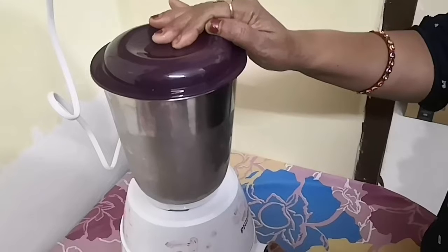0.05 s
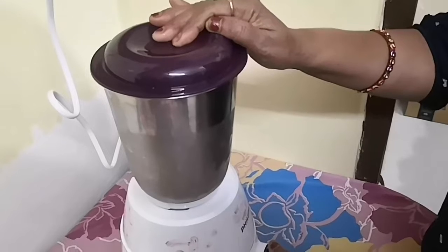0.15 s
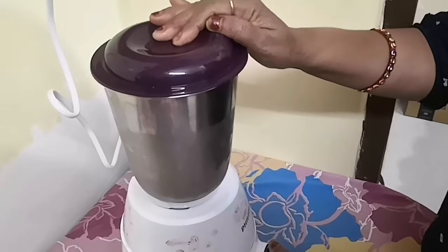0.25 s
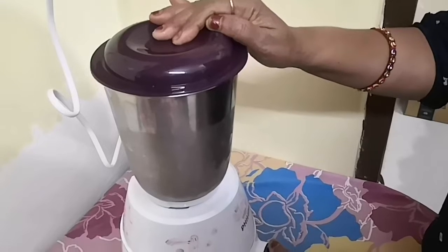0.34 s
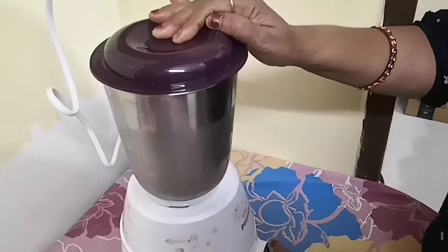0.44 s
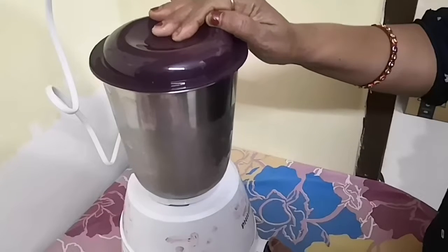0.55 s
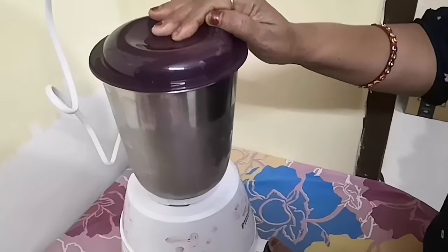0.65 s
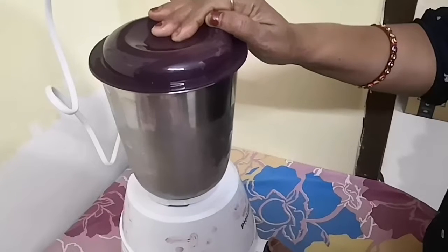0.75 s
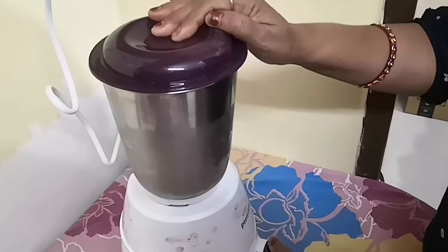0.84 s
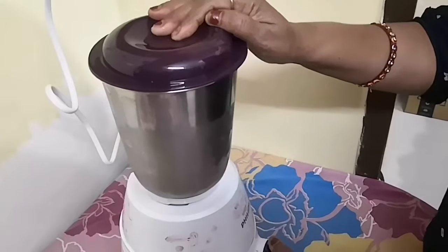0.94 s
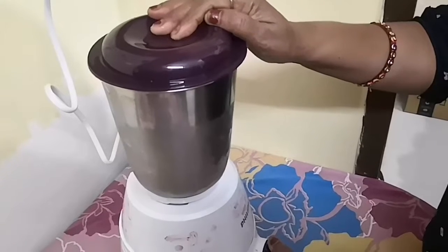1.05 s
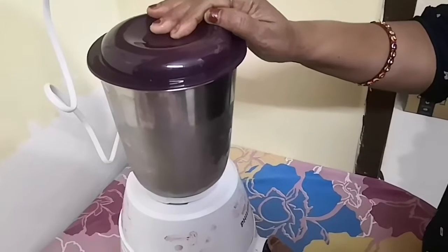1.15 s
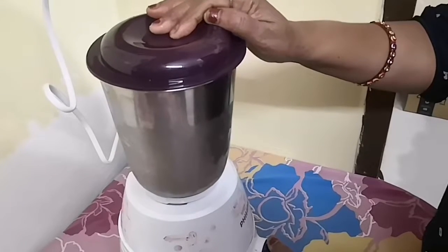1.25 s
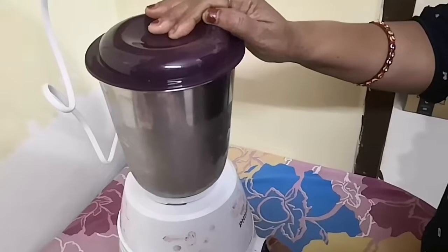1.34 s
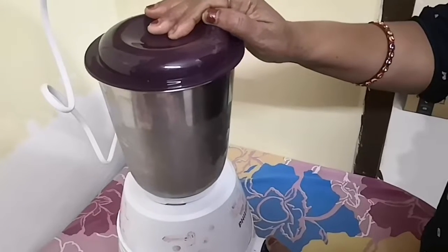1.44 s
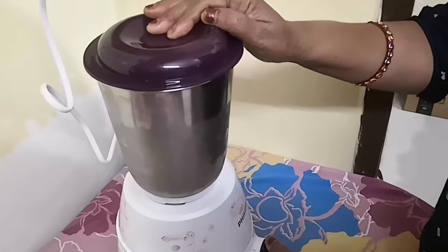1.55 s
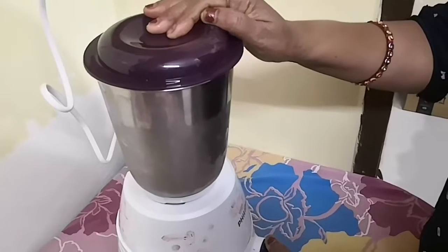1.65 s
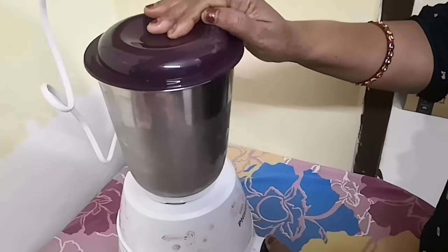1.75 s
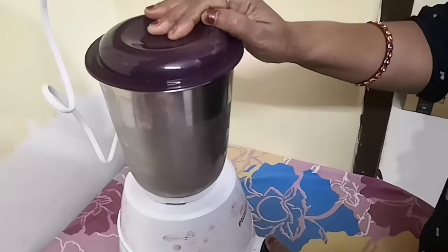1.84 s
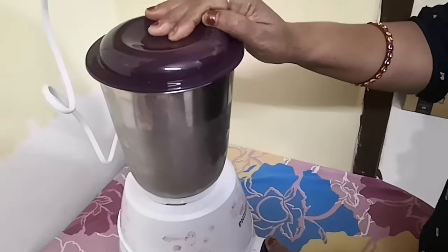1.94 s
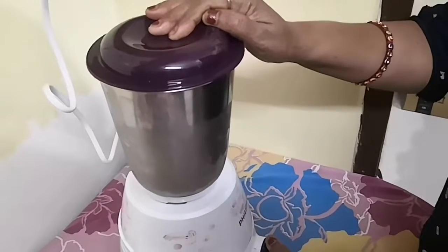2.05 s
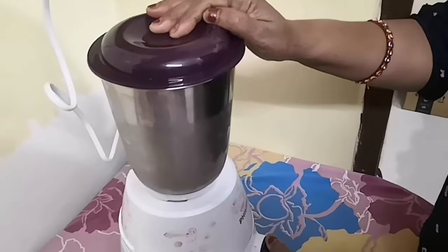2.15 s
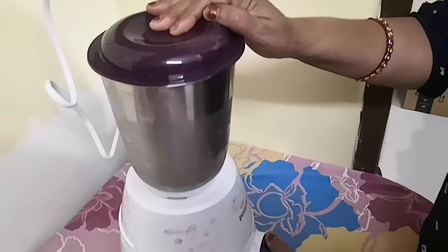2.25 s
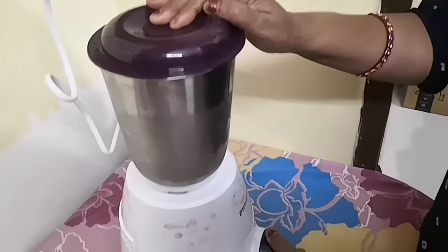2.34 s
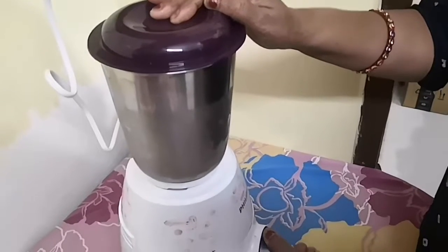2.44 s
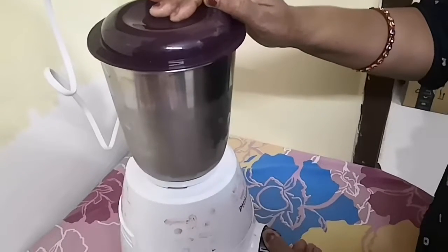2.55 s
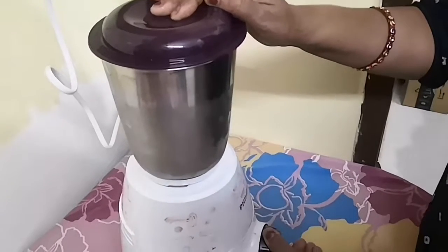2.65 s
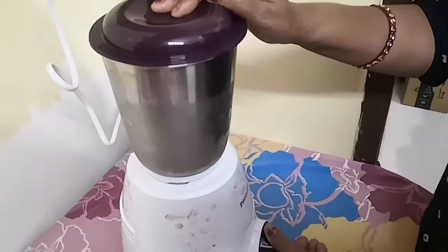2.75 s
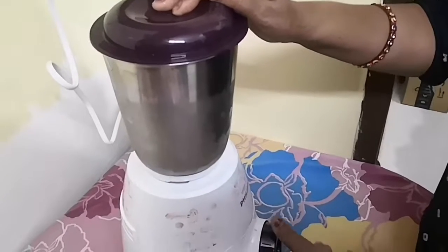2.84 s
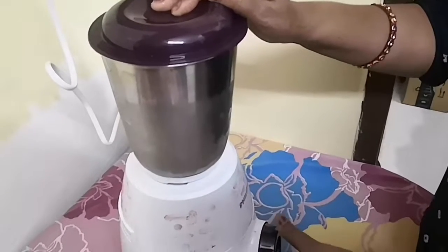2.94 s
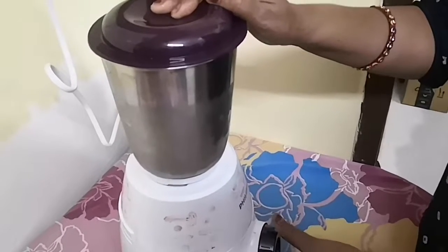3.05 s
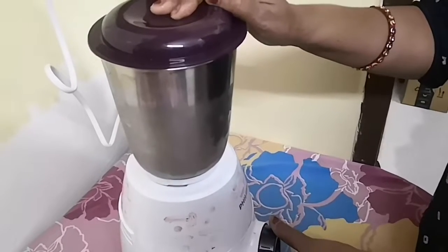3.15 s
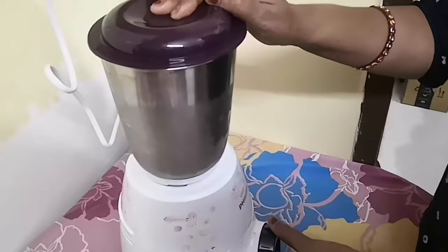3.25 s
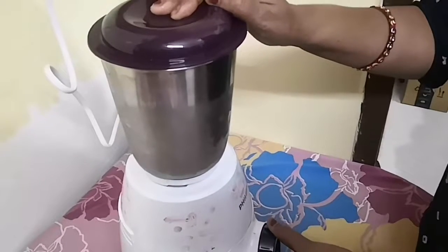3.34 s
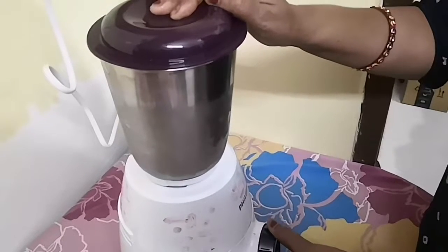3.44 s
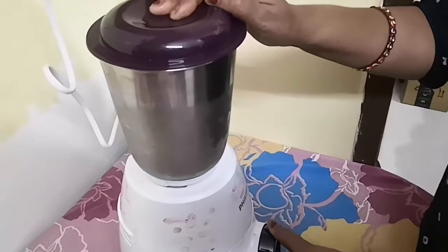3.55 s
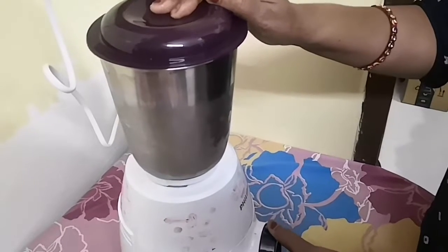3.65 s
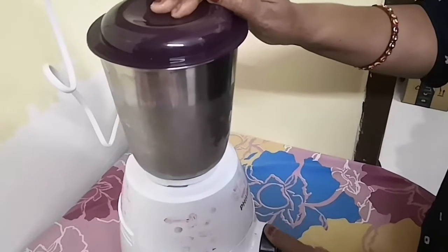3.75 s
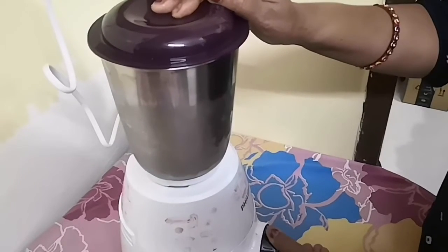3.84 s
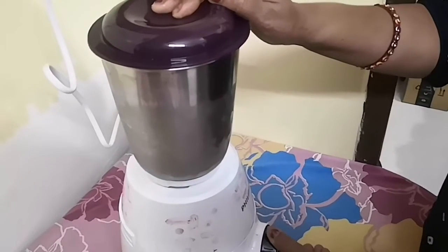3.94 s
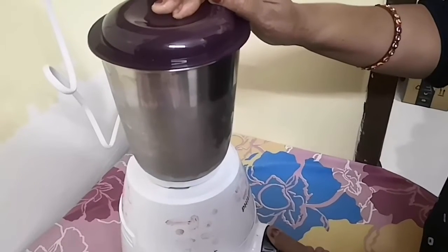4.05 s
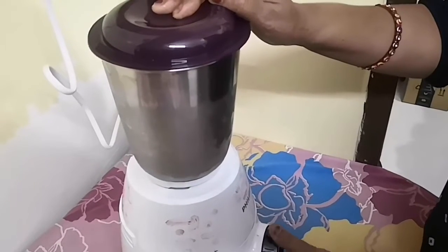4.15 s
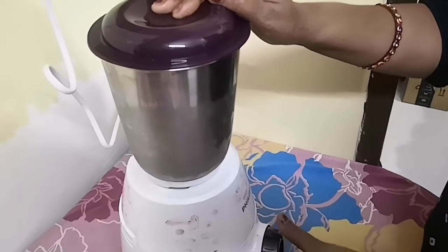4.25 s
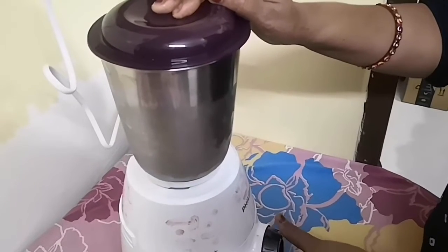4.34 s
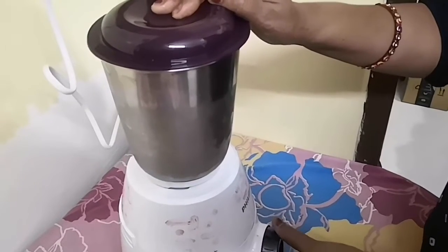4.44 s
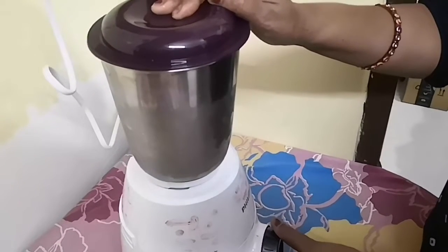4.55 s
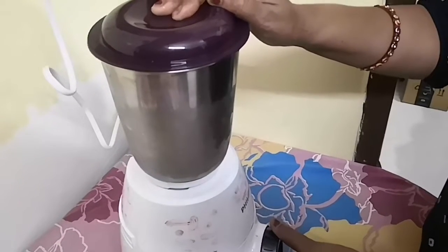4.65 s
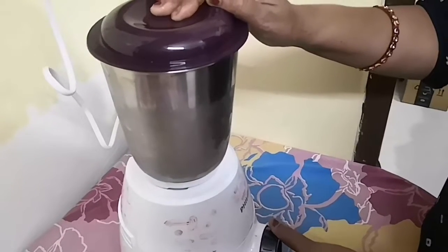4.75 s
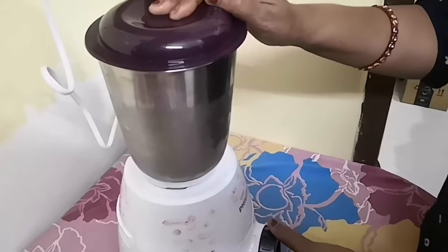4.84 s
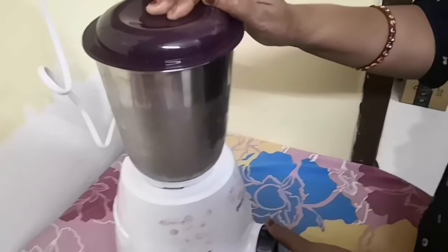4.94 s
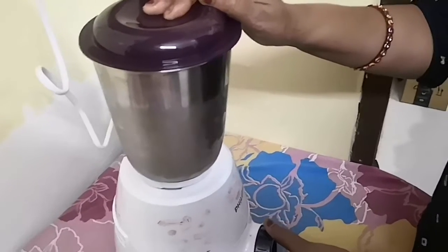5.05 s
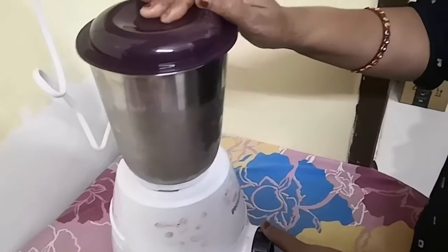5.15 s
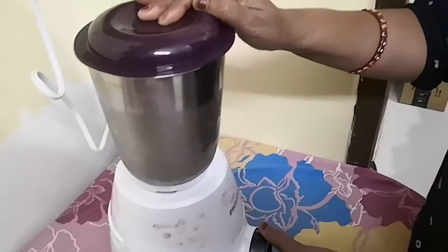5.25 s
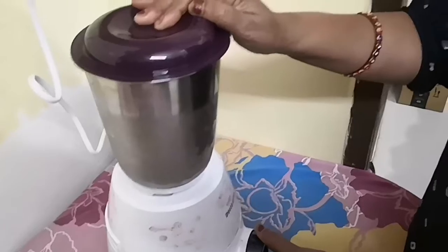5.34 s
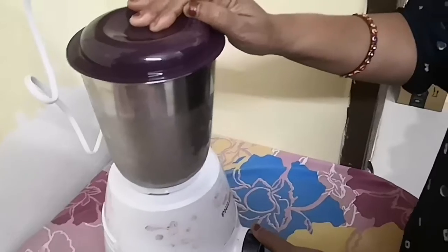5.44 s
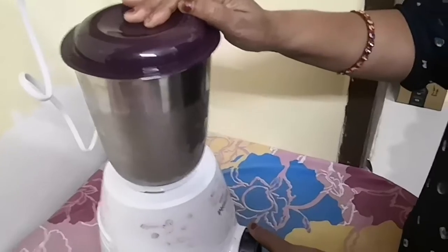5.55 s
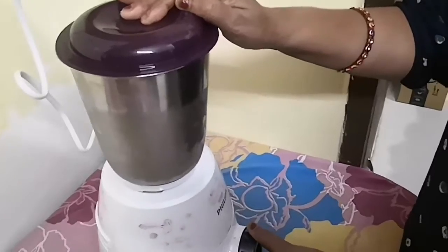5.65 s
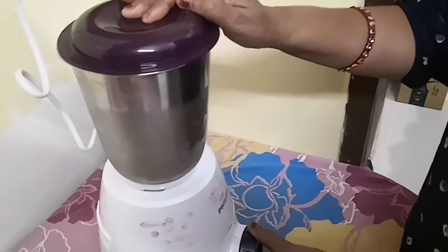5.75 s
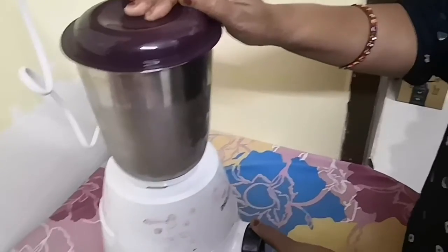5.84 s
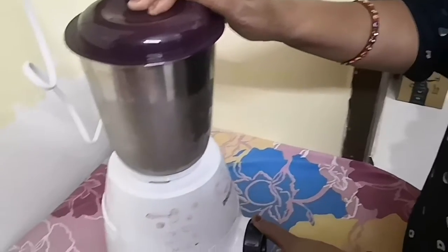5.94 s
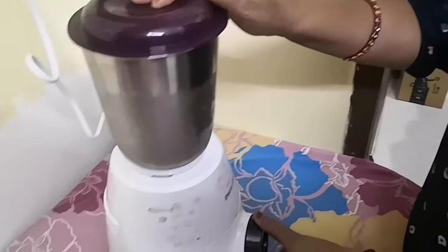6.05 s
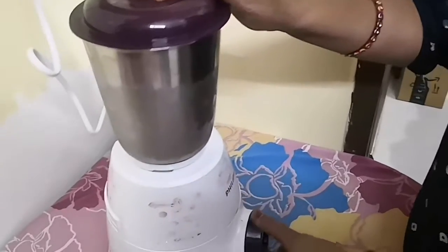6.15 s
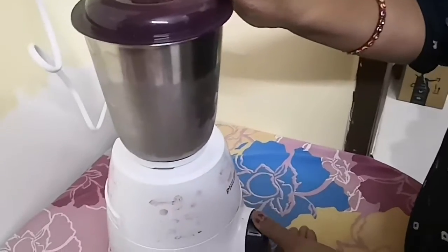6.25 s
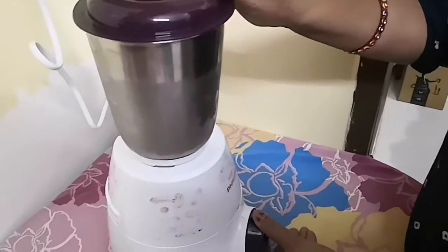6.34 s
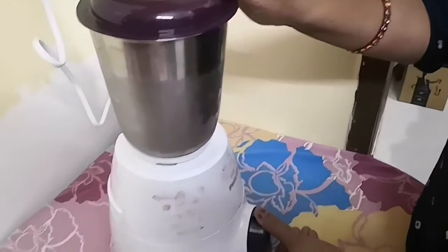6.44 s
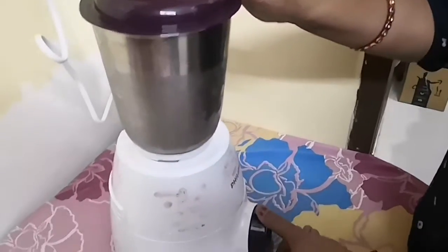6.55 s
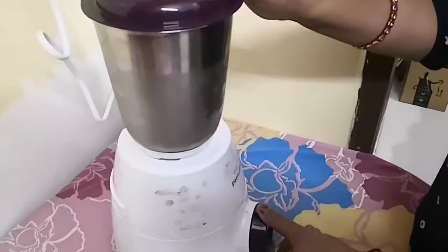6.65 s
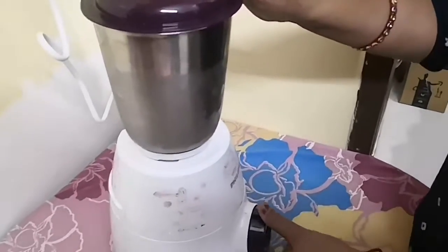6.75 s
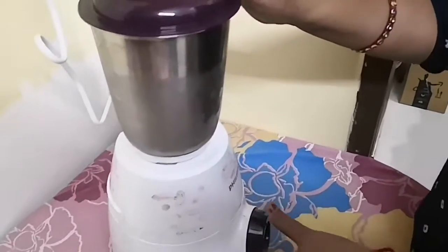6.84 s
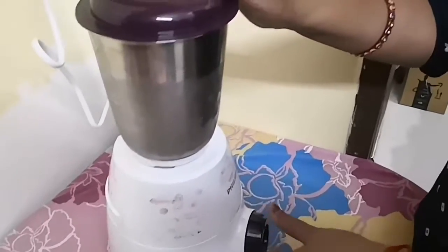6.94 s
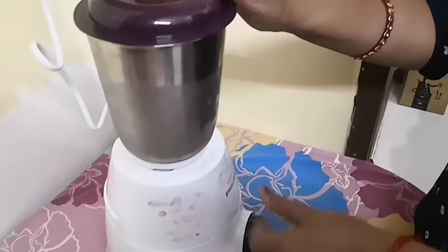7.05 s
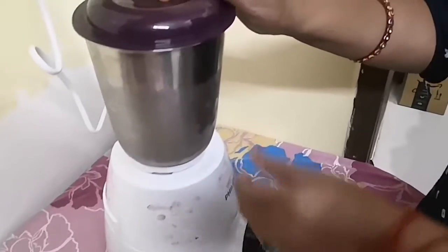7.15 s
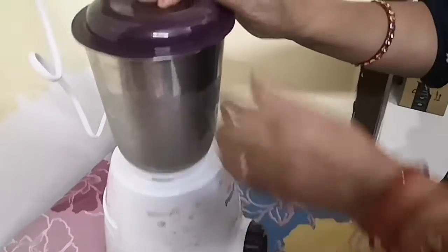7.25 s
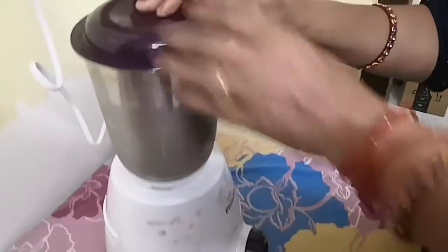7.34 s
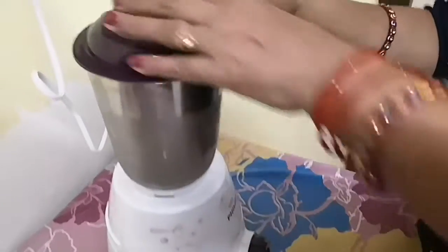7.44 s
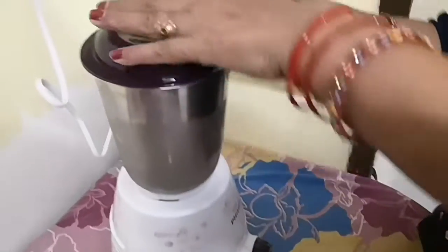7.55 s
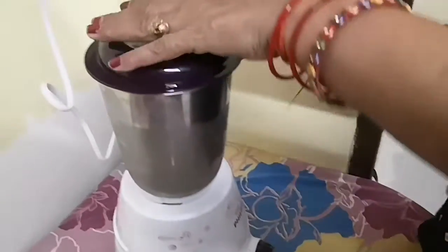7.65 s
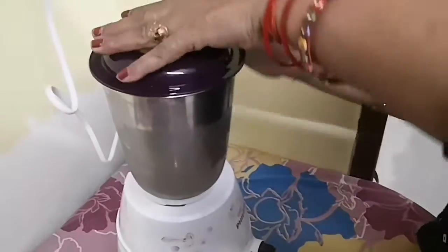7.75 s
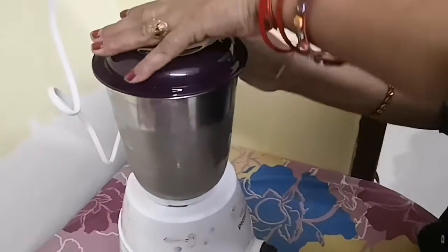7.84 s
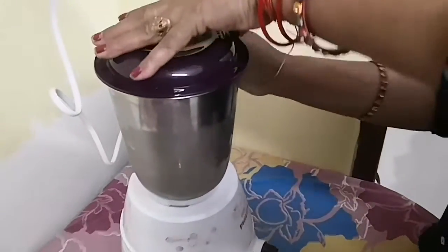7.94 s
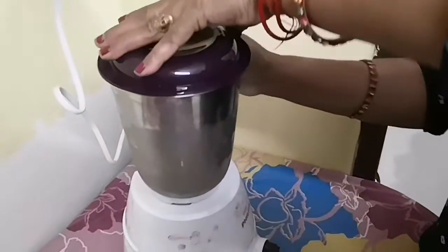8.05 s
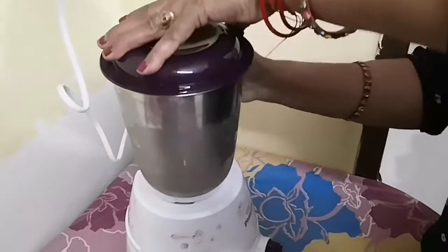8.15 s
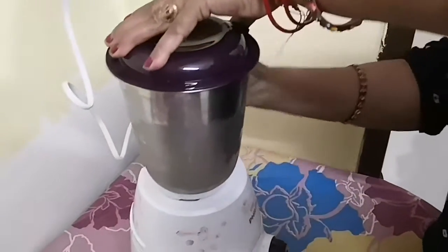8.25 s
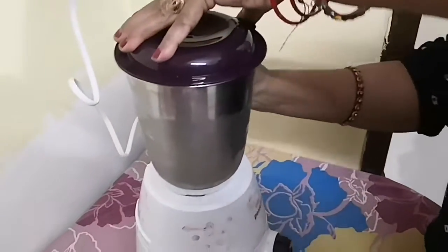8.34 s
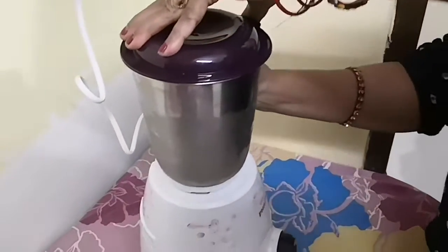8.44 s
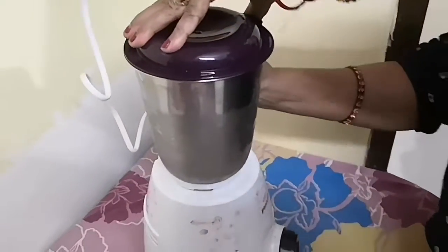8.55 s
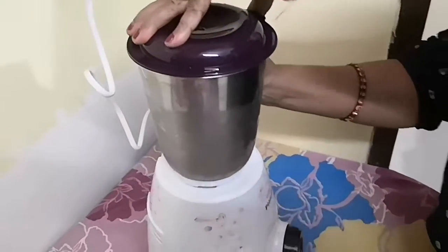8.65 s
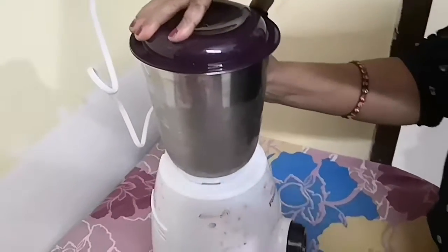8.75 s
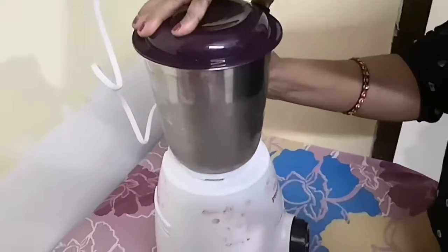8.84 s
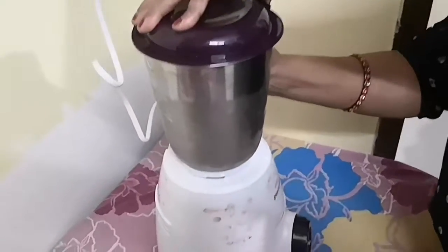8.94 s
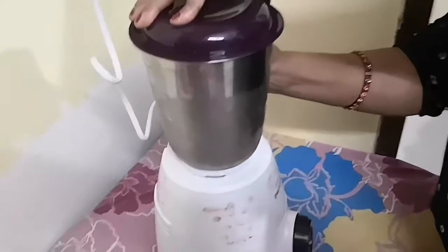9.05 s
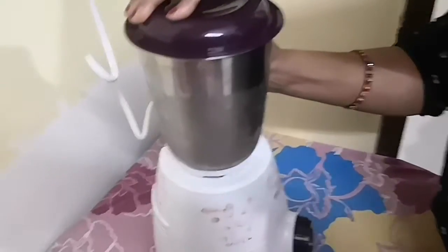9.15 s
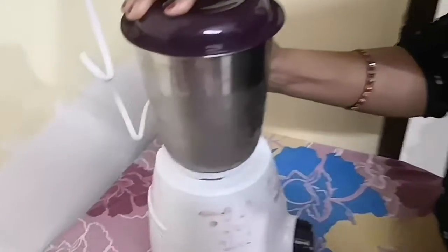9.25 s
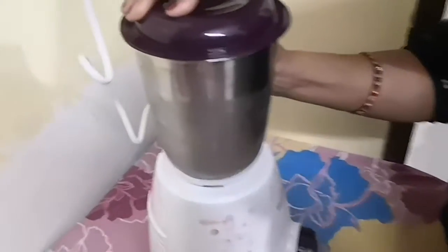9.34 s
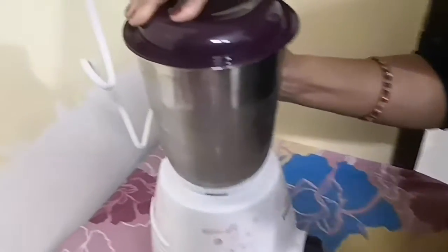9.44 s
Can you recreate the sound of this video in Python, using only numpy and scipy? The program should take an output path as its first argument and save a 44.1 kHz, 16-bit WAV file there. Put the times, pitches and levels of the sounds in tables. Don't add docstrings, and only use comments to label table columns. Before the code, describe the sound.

From 0 s, already at full speed, a mixer grinder blares close to the microphone in a small kitchen: a steady, slightly wavering motor whine with buzzing overtones and hum, under a dense, gritty roar of ice and fruit slush. Lumps strike the steel jar irregularly, singly or in quick clusters, with thin high chips glancing off. At 2.5 s a knob click briefly dips the sound and the whine drops a step, then creeps up; at 3.8 s it drops again, with grinding still strong and knocks continuing. At 6.2 s power is cut: the pitch plunges, the grinding thins, and the last lumps rattle and clunk, ending with a low thud around 7.1 s. From 7.3 to 9.5 s it is very quiet: soft room rumble, distant traffic wash, faint ticks of hands and bangles on the jar, mostly from 8.2 to 9 s, and a slight slide near 8.4 s.

```python
import sys
import numpy as np
from scipy import signal
from scipy.fft import rfft, irfft
from scipy.io import wavfile
from scipy.ndimage import uniform_filter1d

SR = 44100
rng = np.random.default_rng(int(sys.argv[2]) if len(sys.argv) > 2 else 0)


def convert_level_to_amplitude(level_db):
    exponent = np.asarray(level_db, float) / 20
    return 10 ** exponent


def materialize(psi):
    bounded = np.clip(np.atleast_2d(psi).T, -1, 1)
    quanta = np.round(bounded * 32767).astype(np.int16)
    wavfile.write(sys.argv[1], SR, quanta)


N = 418509

# (time [s], speed [turns/s])
ROTOR_SPEED = [(0, 232.5), (1.0, 231.6), (1.45, 232.5), (1.75, 229.8), (2.2, 232.6), (2.49, 231.8),
               (2.53, 213), (2.68, 218.5), (3.6, 223.4), (3.75, 223), (3.79, 207), (4.3, 211.8),
               (4.75, 210.3), (5.85, 213.1), (6.21, 212), (6.56, 108), (6.72, 72), (7.0, 32)]
KNOB_CLICKS_S = [
    2.51,
    3.77,
]
POWER_OFF_S, SWITCH_GAP_S = 6.21, 0.026
REST_TURNS_PER_S, FADE_TURNS_PER_S = 32, 20
CLEAR_ORDERS = (1, 2, 3, 4, 6, 12)
# (level at knob position 3, 2, 1 and coasting [dB], growth after each knob change
# [dB/s])
CLEAR_ORDER_LEVELS = [(-27.5, -26.5, -25.5, -26.5, 0.44), (-35.5, -38, -36.5, -40.5, 0.34),
                      (-38, -36, -34, -31.5, 1.5), (-43, -39.5, -40.5, -37, 2.8),
                      (-38.5, -28.5, -47, -44, 0.6), (-40.5, -35.5, -41.5, -48, 7.8)]
# (multiple, level [dB])
UPPER_ORDERS = [(8, -49.5), (9, -45), (10, -42.5)]
SETTLE_S, SETTLE_DB = 0.09, -16
# (frequency [Hz], level [dB])
COAST_BODY = [(60, -24), (90, -5), (110, -5.5), (200, 1), (300, -1), (370, 0), (470, -16), (800, -14)]
SHUDDER_HZ, SHUDDER_WIDTH_HZ, SHUDDER_DB = 349, 47, 25
HUM_HZ, HUM_DB = 99.5, -31.5
# (multiple of turning, multiple of hum, level [dB])
BEATS = [(1, -1, -43.5), (1, 1, -37), (3, 1, -41.5)]
WOBBLE_ORDER, WOBBLE_DB = 1.555, -33.5
# (time [s], level [dB], length [s])
WOBBLE_SWELLS = [(2.72, -28, .08), (3.55, -23.5, 0.13), (3.73, -25.5, .05)]

# (time [s], grinding level [dB])
LOAD = [(0, -16), (.62, -17.5), (1.3, -16), (1.55, -17.5), (2.33, -16.5), (3.42, -18.5), (3.63, -18),
        (4.06, -19), (5.09, -17.5), (6.25, -17.5), (6.39, -21), (6.52, -25.5), (6.78, -32), (6.88, -32.5),
        (7.03, -49), (7.16, -54), (7.26, -69), (7.38, -95)]
FULL_LOAD_DB = -17
# (level at full load [dB], share of its swing, fall before dying [dB], flutter [dB])
THRUM = (-35, 0, 25, 2.0)
RUMBLE = (-27, 0.35, 24, 0.83)
SPRAY = (-47.5, 0.78, 50, 0.6)
# (time [s], lift of the spray [dB], length [s])
SPLASHES = [(1.7, 2.5, .15), (3.55, 3.5, .15), (4.1, 3.5, .25), (5.7, 1, .1)]
# (time [s], peak of the bright part [dB], weight [dB])
KNOCKS = [(0.408, -8.5, 3), (0.447, -7, 1), (0.479, -10, -8), (0.9138, -14, -4), (1.0251, -12, -2),
          (1.047, -11, -5), (1.3753, -18, 3.5), (1.537, -6, -7), (1.5583, -8.5, 7.5), (1.8527, -8, -6),
          (2.2747, -14, -2), (2.4648, -10, 2), (2.5657, -7, -8), (2.9755, -12, -0.5), (3.0065, -8, 4),
          (3.0846, -9, -2), (3.2829, -6, 3), (3.8863, -11, 6), (3.9543, -11.5, 1.5), (4.1378, -10, -1),
          (4.2475, -8.5, 2), (4.6852, -4.5, 0), (4.8569, -11, 2), (4.9, -9, 1), (5.2265, -8.5, 6),
          (5.289, -15, -6), (5.7415, -13, 7), (5.7932, -10.5, 7.5), (6.0667, -27, 4), (6.0912, -11.5, 6)]
# (time [s], peak of the bright part [dB], weight [dB], thud [dB])
LAST_KNOCKS = [(6.3444, -23, 5, 5), (6.3564, -29, 2, 0), (6.4078, -24, 9, -7), (6.43, -13, 5, -10),
               (6.4714, -26, 3, -3), (6.4852, -18, 7.5, -4), (6.5425, -22.5, 8.5, 3), (6.6311, -27, 0, 2),
               (6.6413, -19.5, 11, -7), (6.6678, -33, 8, -2), (6.7072, -15, 7.5, -5), (6.7244, -21.5, 6, 0),
               (6.7652, -23, 10.5, 3), (6.8079, -25.5, 6.5, -6), (6.83, -34, 7, -2),
               (6.8628, -16.5, 6.5, 1), (6.8859, -15.5, 10, -1), (6.9137, -24.5, 9, 0), (6.9606, -36, 1, 1),
               (6.976, -42, 14, -5), (6.9855, -40, -3, -8), (7.007, -37, -4, -7), (7.033, -47.5, 10, 9),
               (7.0614, -44.5, 14.5, -4), (7.1237, -47.5, 6, 14.5), (7.148, -31.5, -8, -15),
               (7.1694, -51, -4, -7)]
CRACK_S = 0.004
# (frequency [Hz], level [dB per Hz])
BODY = [(26, -44.5), (45, -25.5), (81, -4), (172, 2.5), (220, -9.5), (261, -10), (350, -6.5), (584, -14.5),
        (783, -12), (1020, -12), (2350, -6.5), (2590, -5.5), (3650, -17.5), (5800, -19.5), (15400, -40.5)]
# (frequency [Hz], width [Hz], lift [dB])
RESONANCES = [(136.4, 11, 12.5), (358, 30, 6), (499, 45, -5.5), (594, 32, -2), (775, 50, 6), (850, 58, 5),
              (1332, 59, 7.5), (1585, 65, 4.5), (1720, 60, -6), (1880, 160, 4), (2200, 220, 1.5),
              (2346, 64, -9), (2577, 173, 5.5), (2645, 54, 1.5), (3060, 130, 4.5), (4316, 140, 7),
              (5780, 166, 5.5), (9150, 450, 4.5), (10820, 400, 3.5), (12100, 900, 7.5)]
# (time [s], peak [dB])
SPARKS = [(0.2653, -31.5), (0.6015, -29), (1.047, -29), (1.0819, -34), (1.497, -26), (2.4738, -26),
          (2.7496, -35), (3.0041, -27), (3.0849, -37), (3.269, -25), (4.14, -30), (4.1579, -34),
          (4.2472, -30), (4.2812, -35), (4.5416, -34), (4.8993, -30), (5.1412, -30), (5.223, -30),
          (5.2659, -34), (5.2889, -25), (5.3343, -33), (5.7942, -27.5), (6.0911, -34), (6.355, -32),
          (6.4647, -32), (6.6662, -42), (6.6932, -34), (6.768, -32), (6.8069, -36), (6.8628, -33)]

# (time [s], peak [dB], ring [Hz], low ring [Hz], low ring against peak [dB])
TICKS = [(7.2973, -55, 4500, 2450, 3), (8.2406, -58, 4650, 2680, 14), (8.33, -63, 5660, 2500, 3),
         (8.3844, -64, 5910, 2200, 8), (8.4168, -50, 3600, 2320, -4), (8.4794, -63, 5090, 2450, 15),
         (8.5111, -52, 5800, 2610, -1), (8.5644, -60, 5780, 2370, 8), (8.6556, -47, 3000, 2220, 3),
         (8.9174, -58, 3700, 2300, 0), (9.0104, -65, 7000, 2280, 0)]
RUSTLE_S, RUSTLE_LENGTH_S, RUSTLE_DB = 8.41, 0.08, -67

KITCHEN_T60_S, KITCHEN_DB = 0.2, -16
# (frequency [Hz], level [dB per Hz])
ROOM_RUMBLE = [(15, -38.5), (25, -11), (59, -10), (75, -18.5), (97, -7.5), (161, -2), (204, -12.5),
               (236, -11.5), (420, -18), (550, -50.5), (920, -120)]
ROOM_RUMBLE_DB = -60
# (time [s], lift of the rumble [dB], length [s])
BUMPS = [
    (2.51, 21, .04),
    (7.075, 21, 0.042),
    (7.44, 3, .05),
    (8.06, 5, 0.026),
    (8.45, 4, .08),
    (8.68, 7, .08),
    (9.285, 5, 0.03),
]
# (frequency [Hz], level [dB per Hz])
ROOM_TRAFFIC = [(150, -30), (250, -2), (263, -13), (318, -2.5), (353, -10), (490, -8), (516, -9),
                (976, -2.5), (1950, -5), (2700, -14.5), (4450, -31), (5570, -30.5), (8420, -41.5),
                (15400, -45)]
# (time [s], level [dB])
TRAFFIC = [(7.4, -50), (8.0, -50), (8.7, -49.5), (8.82, -51.5), (9.49, -51)]


def rms_one(x):
    return x / np.sqrt(np.mean(x ** 2) + 1e-20)


def in_time(rows):
    s, *columns = np.transpose(rows)
    return [np.interp(np.arange(N) / SR, s, c) for c in columns]


def at_hz(points, hz):
    table_hz, db = np.array(points).T
    return np.interp(np.log(hz + 1), np.log(table_hz), db)


def swells(rows):
    t = np.arange(N) / SR
    return sum(height * np.exp(-((t - s) / length) ** 2) for s, height, length in rows)


def drift(rate):
    r = np.exp(-80 * np.pi * rate / SR)
    noise = rng.standard_normal(N // 40 + 2002)
    slow = signal.lfilter([1], [1, -2 * r, r * r], noise)[2000:]
    return np.interp(np.arange(N) / 40, np.arange(len(slow)), rms_one(slow))


def grains(per_s, spread_db, clump_db, clump_rate):
    sizes = convert_level_to_amplitude(spread_db * np.minimum(rng.exponential(1, N), 5)) * rng.choice([-1, 1], N)
    struck = rng.random(N) < per_s / SR
    return rms_one(sizes * struck * convert_level_to_amplitude(clump_db * drift(clump_rate)))


def band(x, low_hz, high_hz):
    return signal.sosfilt(signal.butter(2, [low_hz, high_hz], "band", fs=SR, output="sos"), x)


def colour(x, db_of_hz):
    size = 2 ** 14
    cepstrum = irfft(db_of_hz(np.fft.rfftfreq(size, 1 / SR)) * np.log(10) / 20)
    cepstrum[1:size // 2] *= 2
    response = irfft(np.exp(rfft(cepstrum[:size // 2], size)))
    return signal.fftconvolve(x, response[None])[:, :N]


def lift_db(hz):
    return sum(db / (1 + (2 * (hz - centre) / width) ** 2) for centre, width, db in RESONANCES)


def body_db(hz):
    return at_hz(BODY, hz) + lift_db(hz)


def tone_levels(speed):
    t = np.arange(N) / SR
    changes = np.array([0, *KNOB_CLICKS_S, POWER_OFF_S])
    stage = np.searchsorted(changes, t, side="right") - 1
    since = t - changes[stage]
    shudder = SHUDDER_DB / (1 + (2 * (2 * speed - SHUDDER_HZ) / SHUDDER_WIDTH_HZ) ** 2)
    settling = SETTLE_DB * np.exp(-since / SETTLE_S) * (stage > 0)
    for k, row in zip(CLEAR_ORDERS, np.array(CLEAR_ORDER_LEVELS)):
        coasting = at_hz(COAST_BODY, k * speed) + shudder * (k == 2)
        powered = row[-1] * np.minimum(since, 1.3) + settling * (k > 1)
        yield uniform_filter1d(row[stage] + np.where(stage < 3, powered, coasting), size=1500)


def motor():
    speed, = in_time(ROTOR_SPEED)
    order_db = tone_levels(speed)
    t = np.arange(N) / SR
    speed = speed * (1 + 0.0022 * drift(20))
    turn = 2 * np.pi * np.cumsum(speed) / SR
    hum = 2 * np.pi * HUM_HZ * t
    turning = np.clip((speed - REST_TURNS_PER_S) / FADE_TURNS_PER_S, 0, 1)
    powered = np.clip((POWER_OFF_S - t) / 0.015, 0, 1)
    for s in KNOB_CLICKS_S:
        powered = powered * (1 - 0.5 * np.exp(-((t - s) / SWITCH_GAP_S) ** 2))

    whine = np.zeros(N)
    for k, db in zip(CLEAR_ORDERS, order_db):
        flutter_db = 3.5 if k in (2, 4) else 1.5
        whine += convert_level_to_amplitude(db + flutter_db * drift(25)) * np.sin(k * turn + k)
    for k, db in UPPER_ORDERS:
        level = convert_level_to_amplitude(db + 1.3 * lift_db(k * speed) + 2.45 * drift(3.4))
        whine += level * np.sin(k * turn + k) * (speed / 220) ** 0.61

    magnetic = convert_level_to_amplitude(HUM_DB + 1.2 * drift(13)) * np.sin(hum)
    for k, m, db in BEATS:
        level = convert_level_to_amplitude(db + lift_db(k * speed + m * HUM_HZ) + 3.0 * drift(12))
        magnetic += level * np.sin(k * turn + m * hum)
    wobble = convert_level_to_amplitude(WOBBLE_DB) * drift(6.4) + swells([(s, convert_level_to_amplitude(db), length) for s, db, length in WOBBLE_SWELLS])
    magnetic += wobble * np.sin(WOBBLE_ORDER * turn)
    return np.sqrt(2) * (whine * turning + magnetic * powered)


def follows(load_db, part):
    full_db, share, fall_db, flutter_db = part
    swing = load_db - FULL_LOAD_DB
    return full_db + share * swing + np.minimum(0, swing + fall_db) + flutter_db * drift(2.3)


def blows(rows, burst_s, low_db, middle_db, bright_db, top_db):
    out, t = np.zeros(N), np.arange(3000) / SR
    envelope = np.exp(-t / burst_s) * (1 - np.exp(-t / 0.00043))
    bursts = rng.standard_normal((len(rows), 3000)) * envelope
    rung = colour(bursts, body_db)[:, :3000]
    s, db, middle, *thud = np.transpose(rows)
    low, top = rng.normal(0, 3.0, (len(rows), 2)).T
    low = thud[0] if thud else low
    parts = [(500, 970, low + low_db), (1750, 3200, middle + middle_db),
             (3350, 6870, bright_db), (9000, 12000, top + top_db)]
    for low_hz, high_hz, part_db in parts:
        part = band(band(rung, low_hz, high_hz), 0.83 * low_hz, 1.45 * high_hz)
        part *= np.exp(-t / CRACK_S * (low_hz > 7000))
        part *= (convert_level_to_amplitude(db + part_db) / np.abs(part).max(axis=1))[:, None]
        for i, row in zip(np.round(s * SR).astype(int), part):
            out[i:i + 3000] += row
    return out


def jar():
    grind_db, = in_time(LOAD)
    thrum_db, rumble_db, spray_db = (follows(grind_db, part) for part in (THRUM, RUMBLE, SPRAY))
    chips = grains(per_s=2500, spread_db=4.0, clump_db=2.5, clump_rate=27)
    fine = grains(per_s=3900, spread_db=1.5, clump_db=2.6, clump_rate=20)
    slush = rng.standard_normal((2, N))
    raw = np.vstack([slush[0], 0.54 * chips + 0.8 * slush[1], 0.29 * chips + 0.91 * fine])
    rumble, grind, spray = colour(raw, body_db)
    flutter_db = 1.2 + 0.15 * np.clip(FULL_LOAD_DB - grind_db, 0, 20)
    spray_db = spray_db + 6.0 + swells(SPLASHES) + flutter_db * drift(25)
    steady = convert_level_to_amplitude(thrum_db + 3.5) * rms_one(band(rumble, 30, 163))
    steady += convert_level_to_amplitude(rumble_db + 3.0) * rms_one(band(rumble, 202, 708))
    steady += convert_level_to_amplitude(grind_db) * rms_one(band(grind, 610, 6460))
    steady += convert_level_to_amplitude(spray_db) * rms_one(band(spray, 7500, 22000))
    in_slush = blows(KNOCKS, burst_s=0.0011, low_db=-14.5, middle_db=1.5, bright_db=0.5, top_db=-26)
    last = blows(LAST_KNOCKS, burst_s=0.0042, low_db=3.0, middle_db=2.5, bright_db=2.5, top_db=-20.5)
    return steady + in_slush + last


def sparks():
    envelope, t = np.zeros(N), np.arange(2000) / SR
    for s, db in SPARKS:
        i = round(s * SR)
        envelope[i:i + 2000] += convert_level_to_amplitude(db - 8.5) * np.exp(-t / 0.009) * (1 - np.exp(-t / 0.002))
    crackle = 0.7 * grains(per_s=7000, spread_db=-1.0, clump_db=3.0, clump_rate=150)
    crackle += 0.7 * rng.standard_normal(N)
    return envelope * rms_one(band(band(crackle, 11600, 12800), 11000, 13400))


def ticks():
    out, t = np.zeros(N), np.arange(1500) / SR
    noises = rng.standard_normal((len(TICKS), 1500))
    for (s, db, high_hz, low_hz, low_db), noise in zip(TICKS, noises):
        rings = 0.3 * np.sin(2 * np.pi * high_hz * t)
        rings += convert_level_to_amplitude(low_db + 5) * np.sin(2 * np.pi * low_hz * t)
        click = 2.2 * band(noise, 0.55 * high_hz, 1.6 * high_hz) * np.exp(-t / 0.0018)
        i = round(s * SR)
        out[i:i + 1500] += convert_level_to_amplitude(db) * (rings * np.exp(-t / 0.0032) + click)
    slide = swells([(RUSTLE_S, convert_level_to_amplitude(RUSTLE_DB), RUSTLE_LENGTH_S)])
    out += slide * band(rng.standard_normal(N), 2800, 6500)
    return band(band(out, 1720, 8500), 1200, 10000)


def kitchen(x):
    t = np.arange(round(0.5 * SR)) / SR
    tail = band(rng.standard_normal(len(t)), 120, 6000) * convert_level_to_amplitude(-60 * t / KITCHEN_T60_S) * (t > 0.006)
    return signal.fftconvolve(x, tail / np.sqrt(np.sum(tail ** 2)))[:N]


def room_tone():
    traffic_db, = in_time(TRAFFIC)
    rumble_db = ROOM_RUMBLE_DB + swells(BUMPS) + 8.5 + 1.67 * drift(9.2)
    traffic_db = traffic_db + 0.6 * drift(10)
    rumble = colour(rng.standard_normal((1, N)), lambda hz: at_hz(ROOM_RUMBLE, hz))[0]
    traffic = colour(rng.standard_normal((1, N)), lambda hz: at_hz(ROOM_TRAFFIC, hz))[0]
    return convert_level_to_amplitude(rumble_db) * rms_one(rumble) + convert_level_to_amplitude(traffic_db) * rms_one(traffic)


def scene():
    near = jar() + sparks() + ticks()
    return (motor() + near + convert_level_to_amplitude(KITCHEN_DB) * kitchen(near) + room_tone())[None]


def top_cut(x):
    return signal.sosfilt(signal.butter(12, 15690, fs=SR, output="sos"), x)


def record(dry):
    rounded = 1.2 * np.tanh(dry / 1.2)
    low_pass = signal.ellip(10, 0.5, 50, 15120, fs=SR, output="sos")
    return top_cut(signal.sosfilt(low_pass, rounded))


dry = scene()
out = record(dry)
materialize(out)
```